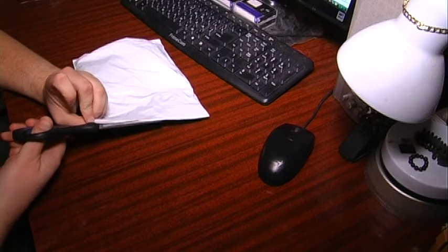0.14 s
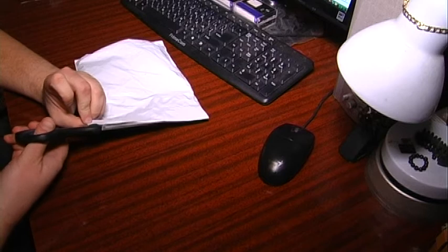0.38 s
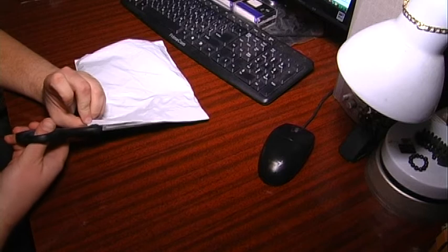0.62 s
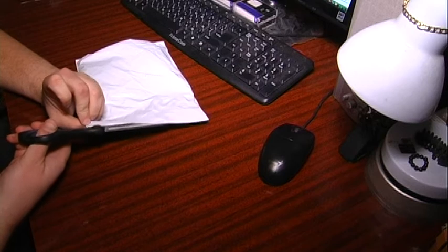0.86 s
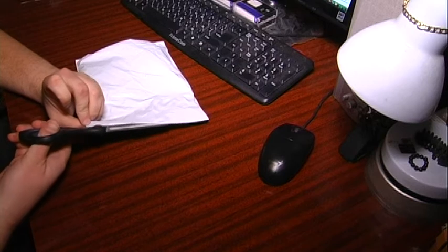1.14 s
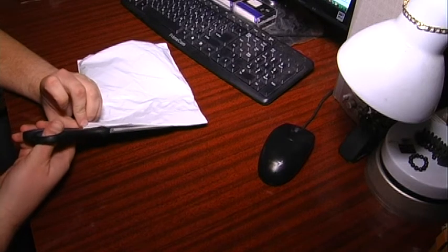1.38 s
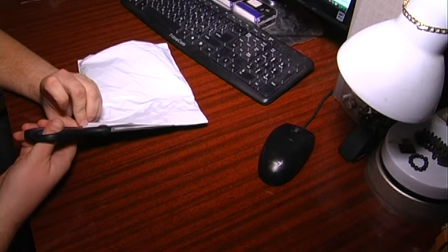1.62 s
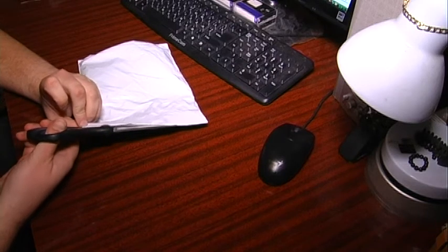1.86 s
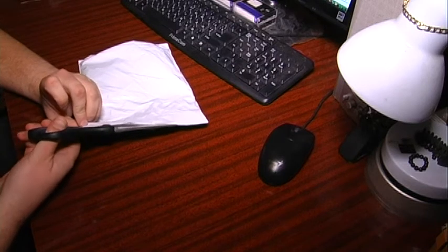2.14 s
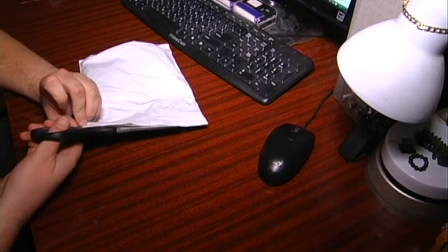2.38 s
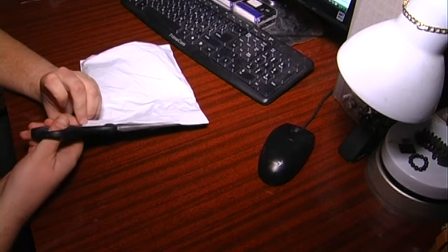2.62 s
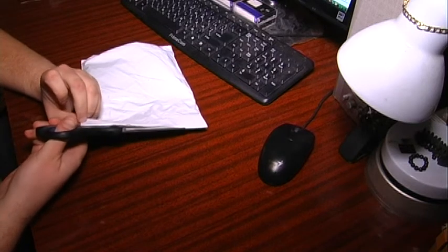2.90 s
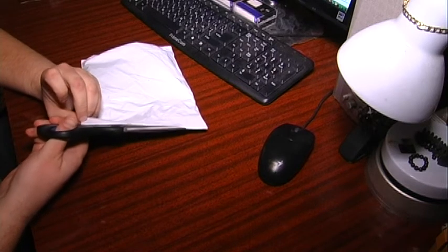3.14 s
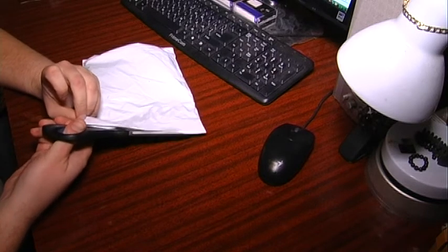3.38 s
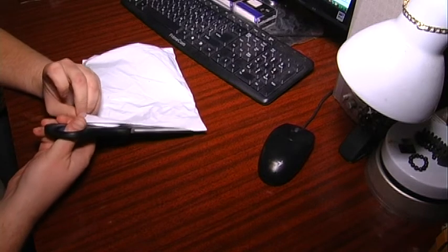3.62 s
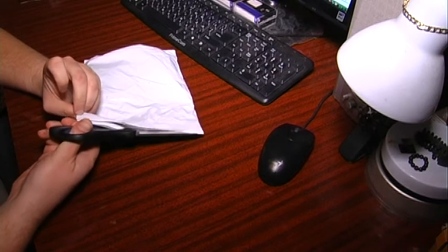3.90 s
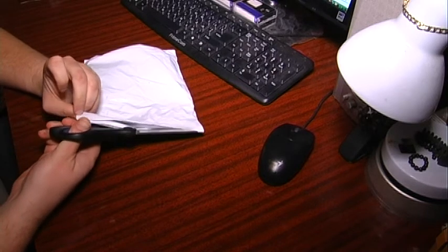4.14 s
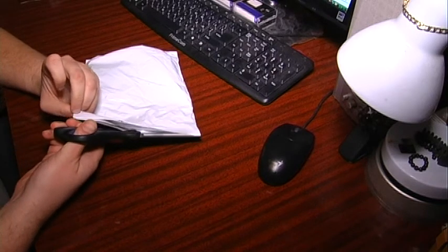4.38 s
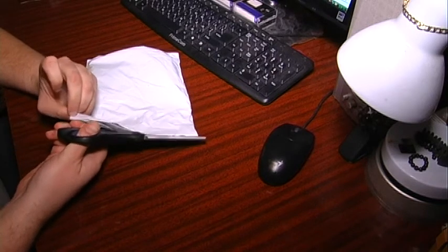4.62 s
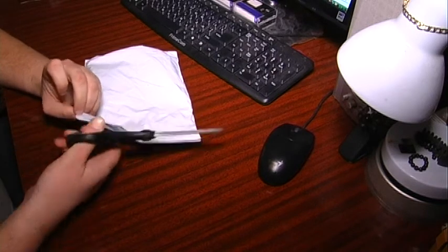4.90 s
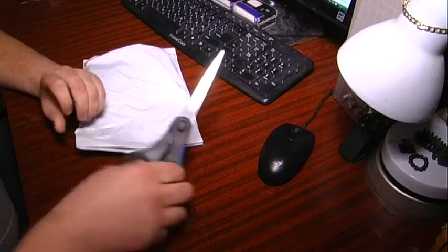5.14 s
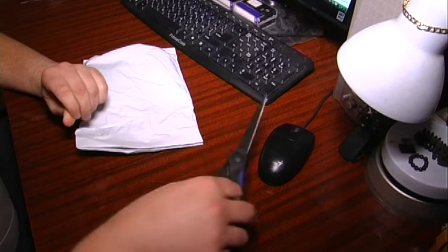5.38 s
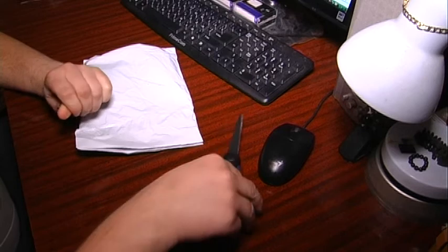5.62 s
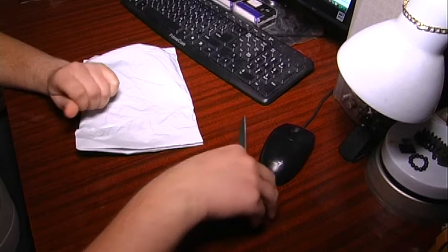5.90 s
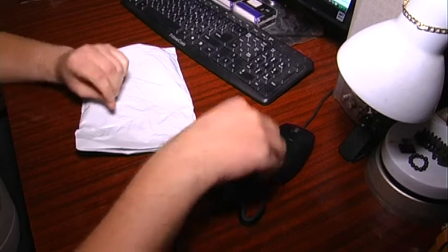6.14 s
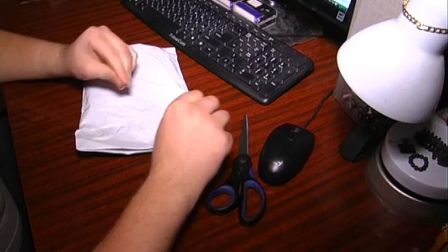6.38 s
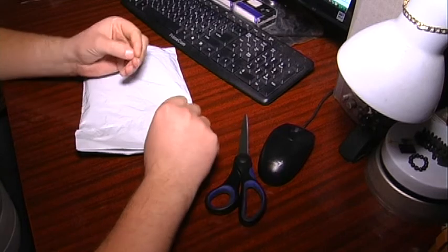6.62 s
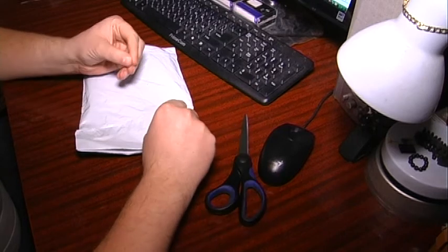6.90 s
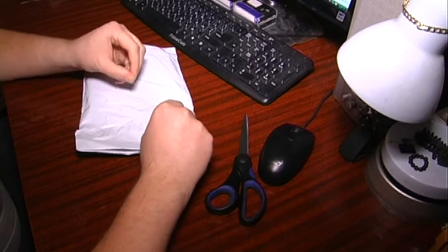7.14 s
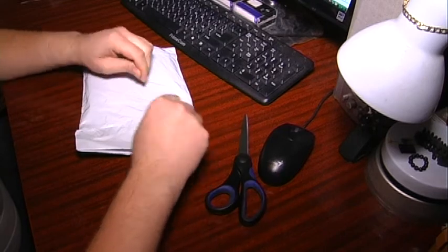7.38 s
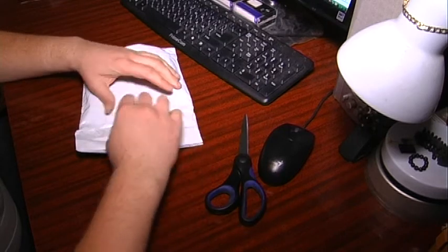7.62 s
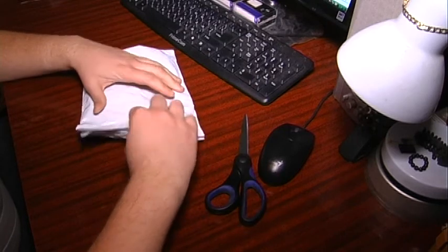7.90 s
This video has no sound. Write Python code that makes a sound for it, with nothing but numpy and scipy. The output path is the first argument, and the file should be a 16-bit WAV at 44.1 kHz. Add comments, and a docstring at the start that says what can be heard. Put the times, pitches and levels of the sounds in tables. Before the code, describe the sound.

In a quiet indoor room with soft fan noise and hum, close scissors slowly cut a thin plastic bag on a wooden desk, giving sparse faint ticks and brief rustles. Around five seconds a low motor buzz starts on the right and stays. The scissors are then put down with a sharp, loud double clatter, and after a pause hands crinkle the bag, increasingly crisp.

```python
"""Throughout, a camera close by hears a quiet room: fan noise and hiss as filtered noise, hum as steady sines.
For five seconds scissors snip slowly through a thin plastic bag on a wooden desk: film noise and resonant snaps.
At 5.1 s a low motor buzz, a sum of harmonics, starts in the right channel and goes on to the end.
From 5.7 s the scissors are laid down with a clatter, struck modes of scissors and desk.
From 7.5 s hands crinkle the bag, with denser film noise and snaps."""
import sys
import numpy as np
from scipy import signal
from scipy.fft import rfft, irfft, next_fast_len
from scipy.io import wavfile
from scipy.ndimage import uniform_filter1d

SR = 44100
rng = np.random.default_rng(int(sys.argv[2]) if len(sys.argv) > 2 else 0)


def attenuation_scalar(level_db):
    """Turn a level in dB into a linear amplitude multiplier (20 dB per decade)."""
    decades = np.asarray(level_db, float) / 20
    return 10 ** decades


def inscribe(sig):
    """Save sig as 16-bit PCM at rate SR to the path in sys.argv[1].

    A 1-D sig is mono; a 2-D sig holds one channel per row.
    Samples are clipped to [-1, 1] before scaling.
    """
    pcm = np.round(np.clip(np.atleast_2d(sig).T, -1, 1) * 32767)
    wavfile.write(sys.argv[1], SR, pcm.astype(np.int16))


N = 353241
T = np.arange(N) / SR  # time in s
M = next_fast_len(N, True)  # transform length
F = np.fft.rfftfreq(M, 1 / SR)  # frequency in Hz


def on_log(hz, table, column=1):
    """Logarithmic frequency scale: read a table by linear interpolation along it."""
    table = np.array(table)
    return np.interp(np.log(np.maximum(hz, 1)), np.log(table[:, 0]), table[:, column])


def unit(x):
    """Root-mean-square normalization: scale to rms 1."""
    return x / np.sqrt(np.mean(x ** 2))


def peak(x):
    """Peak normalization: scale to peak 1."""
    return x / np.abs(x).max()


def band(x, hz, width):
    """Simple resonance: a two-pole filter with gain 1 at its centre."""
    return signal.lfilter(*signal.iirpeak(min(hz, .44 * SR), hz / width, SR), x)


def walk(rate):
    """Low-pass random process: values drawn at a rate per second, smoothed twice, rms 1."""
    k = int(SR / rate)
    steps = np.repeat(rng.standard_normal(N // k + 1), k)
    smooth = uniform_filter1d(uniform_filter1d(steps, k), k)
    return unit(smooth[:N])


def add(track, s, sound):
    """Superposition: mix a short sound in at a time in seconds."""
    i = int(s * SR)
    track[..., i:i + sound.shape[-1]] += sound[..., :N - i]


def ring(modes, push):
    """Modal synthesis: a push convolved with decaying sines of varied strength; rms 1 over the first 10 ms."""
    hz, db, t60 = np.transpose(modes)[:, :, None]
    t = T[:int(SR * t60.max())]
    luck = attenuation_scalar(1.5 * rng.standard_normal((len(modes), 1)))
    decay = np.exp(-np.log(1000) * t / t60)
    body = (luck * attenuation_scalar(db) * np.sin(2 * np.pi * hz * t) * decay).sum(axis=0)
    sound = signal.fftconvolve(body, push)
    return sound / np.sqrt(np.mean(sound[:SR // 100] ** 2))


# Spectral shape of fan noise and hiss. Each row: frequency in Hz, relative density in dB per Hz.
AIR_COLOUR = [(15, -51), (25, -23.5), (108, -7.5), (162, -13), (454, -5), (579, -10), (739, -7), (943, -15),
              (1490, -16.5), (1960, -16), (2120, -18), (2940, -26), (5790, -27.5), (14900, -30),
              (16200, -40)]
# Stereo image of that noise. Each row: frequency in Hz, left minus right in dB, likeness of the channels 0-1.
AIR_STEREO = [(60, -8, 0.6), (191, 5, 0), (260, 10.5, 0.8), (414, -0.5, 0.52), (1000, 1.5, 0.91),
              (2000, -3.5, 0.44), (3050, -2.5, 0), (6000, 3, 0.03), (14980, 5.5, .05)]
# Narrow bands in the fan noise. Each row: centre in Hz, width in Hz, rms level in dB before a slow wander.
FAN_RESONANCES = [(179.8, 14, -74), (236.7, 13, -73.5), (427, 79, -83.5), (642.7, 5.3, -79.5),
                  (1943, 11, -83.5), (9930, 24, -97)]


def air():
    """Partial coherence: coloured noise partly shared by the ports, with narrow fan bands and a slow wander."""
    level_db, left_lag_s = -65.5, 0.00026
    shared, left, right = (rfft(rng.standard_normal(M)) for _ in range(3))
    like = np.clip(on_log(F, AIR_STEREO, column=2), 0, 1)
    lag = np.exp(-2j * np.pi * F * left_lag_s)
    common = np.sqrt(like) * shared * np.array([lag, lag ** 0])
    separate = np.sqrt(1 - like) * np.array([left, right])
    tilt = on_log(F, AIR_STEREO) / 2
    colour = attenuation_scalar(on_log(F, AIR_COLOUR) + np.array([tilt, -tilt]))
    out = attenuation_scalar(level_db) * unit(irfft((common + separate) * colour, M)[:, :N])
    for hz, width, db in FAN_RESONANCES:
        noise = rng.standard_normal((2, N))
        out += attenuation_scalar(db) * unit(band(noise + .5 * noise[::-1], hz, width))
    return out * attenuation_scalar(.5 * walk(1.62))


# Steady hum tones. Each row: frequency in Hz, left rms level in dB, right rms level in dB.
HUM_TONES = [(25, -86, -87), (50, -79, -86), (62.5, -84, -78), (100.01, -92, -67), (120.05, -85, -68),
             (8000, -91, -91), (15625, -79, -79)]


def hum():
    """Superposition of pure tones: steady sines at their own level in each channel."""
    out = np.zeros((2, N))
    for hz, left_db, right_db in HUM_TONES:
        level = attenuation_scalar(np.array([[left_db], [right_db]]))
        out += np.sqrt(2) * level * np.cos(2 * np.pi * hz * T)
    return out


# Blades slide through or along the film. Each row: start in seconds, length in seconds, level in dB,
# treble above 9 kHz in dB relative to that level.
BLADE_SLIDES = [(.0, 0.018, -77, 10), (0.197, 0.087, -82, 1), (0.396, 0.057, -75.5, -2), (.6, .03, -78, -1),
                (.66, .04, -76, -2), (0.778, 0.081, -70, -3), (1.475, 0.098, -75.5, 2.5),
                (1.862, .06, -77, -12), (1.927, 0.037, -74, 4), (2.41, .07, -75.5, 2.5),
                (3.006, 0.038, -69.5, 1.5), (3.156, 0.088, -78.5, 2), (3.51, 0.038, -69.5, 0.5),
                (3.72, 0.083, -70, -9), (3.817, 0.043, -81, -1), (3.963, 0.094, -69, -1.5),
                (4.153, 0.049, -74, -1), (4.19, 0.081, -73, -5), (4.429, 0.055, -74.5, 3.5),
                (4.735, .025, -75, -2), (4.9, .04, -74, -8), (4.972, 0.084, -74.5, -2),
                (5.093, .04, -75, -18)]


def slides():
    """Friction envelope: power of film motion in middle, treble and body; each slide rises, holds and decays."""
    attack_s, release_s, body_db = 0.011, 0.011, -3  # body is below 3 kHz
    power = np.zeros((3, N))
    t = T[:SR // 3]
    for s, length, db, treble_db in BLADE_SLIDES:
        shape = np.minimum(t / attack_s, 1) * np.exp(-np.maximum(t - length, 0) / release_s)
        level = attenuation_scalar(db + np.array([[0], [treble_db], [body_db]]))
        add(power, s, (level * shape) ** 2)
    return power


# Colour of the film's rustle. Each row: frequency in Hz, relative density in dB per Hz.
FILM_COLOUR = [(290, -4), (500, 3.5), (604, -6), (631, -0.5), (919, 7), (1110, 4), (2230, 0.5), (3590, -25),
               (4530, -13.5), (6060, -15), (16000, -29)]


def rustle():
    """Stick-slip noise: dense slips of uneven size, coloured by the film; more motion power is louder."""
    slips = rng.standard_normal(N) * attenuation_scalar(2.5 * rng.exponential(size=N) + 2.5 * walk(200))
    colour = rfft(slips, M) * attenuation_scalar(on_log(F, FILM_COLOUR))
    treble = 1 / (1 + (9000 / np.maximum(F, 1)) ** 8)
    body = 1 / (1 + (F / 3000) ** 8)
    parts = [unit(irfft(colour * share, M)[:N]) for share in (1 - treble - body, treble, body)]
    motion = slides() + flutter() + crumple()
    return (np.sqrt(motion) * parts).sum(axis=0)


# Single snaps of blade and film. Each row: start in seconds, crack peak in dB, crack pitch in Hz,
# dull tick rms over 4 ms in dB, tick pitch in Hz; levels are those before panning and the room.
FILM_SNAPS = [(.1538, -66, 5900, -65, 1950), (.4, -56, 5590, -72, 1910), (0.579, -54, 5930, -72, 1100),
              (.6054, -48, 7420, -59, 1310), (.61, -41, 6000, -67, 1730), (.6592, -40.5, 6700, -81, 1710),
              (0.6807, -54, 4060, -58, 1010), (.7831, -54, 5840, -64, 1620), (0.804, -45, 8100, -65, 1670),
              (.8776, -42, 4330, -81, 2440), (1.428, -50, 6930, -70, 1130), (1.528, -69, 7160, -59, 1500),
              (1.8476, -55, 4730, -84, 1950), (1.8783, -53, 5210, -82, 1000),
              (1.937, -45.5, 12400, -80, 1940), (1.9902, -36, 9000, -57.5, 1300),
              (2.4657, -53, 5240, -63, 1920), (2.4913, -40, 4730, -52.5, 2200),
              (2.5747, -47.5, 11000, -61.5, 1560), (3.012, -49, 12200, -74, 1100),
              (3.043, -39.5, 6400, -67, 2220), (3.0667, -38.5, 4440, -56.5, 2110),
              (3.165, -48, 6240, -60, 1700), (3.209, -51, 5800, -66, 1320),
              (3.2996, -68, 5670, -57.5, 2300), (3.5184, -46, 7500, -61.5, 1400),
              (3.5535, -50, 7460, -64, 1880), (3.5777, -37.5, 5700, -55, 2140),
              (3.715, -35, 10500, -57, 1530), (3.7308, -43, 11600, -66, 1720),
              (3.795, -39, 5200, -57, 1300), (3.863, -43.5, 6700, -63, 1360),
              (3.9792, -46, 5270, -61, 1080), (3.9936, -46, 8070, -69, 1630),
              (4.0264, -45, 7380, -67, 1320), (4.0485, -36, 5700, -55, 2000), (4.064, -49, 6020, -63, 1390),
              (4.146, -52, 9370, -68, 1120), (4.156, -55, 5280, -70, 1950), (4.1734, -48, 11900, -69, 1600),
              (4.196, -39.5, 10600, -79, 1970), (4.488, -54, 11700, -71, 1930),
              (4.5118, -34, 4630, -52.5, 1350), (4.564, -50, 8350, -67, 1780),
              (4.665, -54, 9930, -75, 1240), (4.7402, -47, 9800, -68, 1900), (4.9252, -55, 6120, -53, 1910),
              (4.9771, -42, 6100, -58.5, 1460), (5.103, -41.5, 3830, -58, 2290),
              (5.1127, -44, 4550, -59, 1140), (7.567, -49.5, 5570, -60, 1250),
              (7.5916, -55, 5780, -58, 1010), (7.6139, -47, 4020, -50.5, 1000),
              (7.7167, -50, 5870, -53.5, 2240), (7.7292, -46, 5940, -56, 1750),
              (7.748, -41, 5000, -60, 2300), (7.7628, -50, 4980, -50, 1100),
              (7.7704, -52, 11800, -58, 2280), (7.782, -39, 6240, -65, 2030),
              (7.8231, -41, 6440, -67, 2540), (7.831, -38, 8280, -65, 2500),
              (7.8544, -48, 5830, -53.5, 1040), (7.861, -42, 5880, -59, 1290),
              (7.9245, -35, 12900, -60, 1570), (7.9353, -31, 4700, -69, 2290),
              (7.956, -36, 6810, -51, 2600), (7.9713, -28.5, 4580, -61, 2570),
              (7.986, -29, 6560, -54, 1350), (8.0004, -44, 5360, -55, 1170)]


def snaps():
    """Excited resonance: a short decaying noise burst rings round its pitch, over a duller tick."""
    left_db, scatter_db = -1, 2.5  # mean and spread of left minus right: spots all over the bag
    out, t = np.zeros((2, N)), T[:SR // 40]
    for s, db, hz, tick_db, tick_hz in FILM_SNAPS:
        burst = rng.standard_normal((2, len(t)))
        crack = burst[0] * np.exp(-t / 0.00068)
        crack = band(crack, hz, 0.38 * hz) + 0.15 * band(crack, 7300, 18300) + 0.43 * band(crack, 6400, 600)
        tick = band(burst[1] * np.exp(-t / 0.0011), tick_hz, .5 * tick_hz)
        sound = attenuation_scalar(db) * peak(crack) + attenuation_scalar(tick_db) * tick / tick[:SR // 250].std()
        pan_db = left_db + scatter_db * rng.standard_normal()
        add(out, s, sound * attenuation_scalar(np.array([[pan_db], [-pan_db]]) / 2))
    return out


def flutter():
    """Free decay: after each snap the film's motion power dies away exponentially."""
    level_db, decay_s, treble_db, body_db = -27, 0.011, -14, 2  # level relative to the crack's peak
    power = np.zeros((3, N))
    level = attenuation_scalar(level_db + np.array([[0], [treble_db], [body_db]]))
    tail = level * np.exp(-T[:SR // 10] / decay_s)
    for s, db, *_ in FILM_SNAPS:
        add(power, s, (attenuation_scalar(db) * tail) ** 2)
    return power


# Harmonics of the motor. Each row: multiple of the turning rate, level in dB before waver and engagement,
# largest waver in dB.
BUZZ_HARMONICS = [(1, -90, 0.5), (4, -68, 1.5), (5, -63, 0.5), (6, -74, 3), (7, -54, 0.6), (8, -70, 5),
                  (9, -75, 5), (10, -71, 4)]


def motor_buzz():
    """Harmonic series: multiples of the turning rate, strongest just as the motor engages."""
    start_s, turning_hz = 5.118, 25
    since = np.maximum(T - start_s, 0)
    engage = (1 - np.exp(-since / 0.0097)) * (1 + 0.99 * np.exp(-since / 0.022))
    # it comes up to speed from slightly below
    turned = since - .035 - 0.0041 * (1 - np.exp(-since / 0.044))
    buzz = np.zeros(N)
    for k, db, waver_db in BUZZ_HARMONICS:
        level = attenuation_scalar(db + waver_db * np.clip(walk(1.9), -1, 1))
        buzz += np.sqrt(2) * level * np.cos(2 * np.pi * k * turning_hz * turned)
    shudder = attenuation_scalar(-67.5) * unit(band(rng.standard_normal(N), 190, 155.2))
    return engage * (buzz + shudder) * attenuation_scalar(np.array([[-35], [0]]))  # left 35 dB below right


def chatter(decay_s):
    """Repeated impact: loose parts chatter after a blow, as decaying noise led by one impulse."""
    push = rng.standard_normal(SR // 25) * np.exp(-T[:SR // 25] / decay_s)
    push[0] = 1.3
    return push


# The scissors land and rock on the desk. Each row: start in seconds, blade tick peak in dB, then pivot clack,
# handle knock and desk thud in dB rms over their first 10 ms; levels are those before the high-pass.
SCISSOR_LANDINGS = [(5.6941, -25, -38.5, -34.5, -39.5), (5.7142, -32.5, -43.5, -54.5, -48),
                    (5.887, -10.5, -35, -31, -39.5), (5.8959, -27.5, -31, -38, -53.5),
                    (5.9072, -33, -35, -26, -44.5), (5.9157, -37.5, -47, -46, -44.5),
                    (5.9324, -35.5, -56, -28.5, -38.5), (5.9415, -28, -39.5, -35, -32),
                    (5.9563, -30.5, -47, -55, -42), (5.973, -44, -51, -43.5, -42),
                    (5.9874, -61, -64, -59.5, -41.5), (6.103, -74, -47.5, -45, -46.5)]
# Modes of the blades, pivot, handles and desk top. Each row: frequency in Hz, relative level in dB,
# 60 dB decay time in seconds.
BLADE_MODES = [(3530, -4, 0.0055), (3980, 6, 0.0018), (4660, 6, 0.0066), (5540, 2, .004),
               (6100, -3.5, 0.0045), (7200, -8.5, .003), (7870, -20.5, 0.0031), (10800, -23, 0.0018)]
PIVOT_MODES = [(1258, -12.5, 0.013), (1360, 4.5, 0.019), (1680, 8, 0.015), (2050, 5.5, .01),
               (2190, 2, 0.011), (2704, -15.5, .01)]
HANDLE_MODES = [(644, 3, 0.057), (716, 1, 0.056), (818, 11, 0.023), (813, -3.5, 0.14), (900, -10, 0.033),
                (997, -2, 0.17)]
DESK_MODES = [(101, -5, .8), (126, -6, .2), (175, -9, .15), (209, 0, .25), (248, -3, .2), (279, -7, .2),
              (343, -2, .13), (393, -4, .11), (430, -3, .13), (490, -6, .1), (540, -5, .1)]


def landings():
    """Impact excitation: one blow makes blades and pivot chatter, handles knock and the desk top thud."""
    out = np.zeros(N)
    for s, tick_db, clack_db, knock_db, thud_db in SCISSOR_LANDINGS:
        add(out, s, attenuation_scalar(tick_db) * peak(ring(BLADE_MODES, chatter(0.0032))))
        add(out, s, attenuation_scalar(clack_db) * ring(PIVOT_MODES, chatter(0.0062)))
        add(out, s, attenuation_scalar(knock_db) * ring(HANDLE_MODES, np.hanning(16)))
        add(out, s, attenuation_scalar(thud_db) * ring(DESK_MODES, np.hanning(40)))
    # too small to radiate deep bass
    return signal.sosfilt(signal.butter(4, 85, "high", fs=SR, output="sos"), out)


# Hands press and crumple the bag, unevenly harder. Each row: time in seconds, level in dB.
HAND_CRUMPLE = [(7.48, -95), (7.56, -73), (7.69, -77), (7.725, -62.5), (7.81, -68.5), (7.835, -64),
                (7.91, -66.5), (7.935, -60.5), (8.01, -62)]


def crumple():
    """Amplitude envelope: the hands' force sets the power of film motion in middle, treble and body."""
    treble_db, body_db = -11, -1  # relative to the middle
    hands = attenuation_scalar(np.interp(T, *np.transpose(HAND_CRUMPLE))) * (T > HAND_CRUMPLE[0][0])
    return (hands * attenuation_scalar(np.array([[0], [treble_db], [body_db]]))) ** 2


# Reverberation time of the room. Each row: frequency in Hz, 60 dB decay time in seconds.
REVERBERATION = [(100, 0.47), (500, 0.23), (2000, 0.31), (4000, 0.17), (12000, 0.2)]
# Echoes off desk and nearby things. Each row: delay in seconds, left level in dB, right level in dB, polarity;
# levels are relative to the direct sound.
CLOSE_ECHOES = [(.0005, -9, -14, 1), (.0011, -14, -9, -1), (.0018, -10, -14, -1), (.0027, -14, -10, 1),
                (.0037, -12, -12, -1)]


def room():
    """Room impulse response: direct sound, close echoes, then a diffuse tail that lasts longest in the bass."""
    tail_db = -10.5  # energy relative to the direct sound
    t = T[:int(.7 * SR)]
    out = np.zeros((2, len(t)))
    for hz in 90 * 2 ** np.arange(0, 7.5, .5):
        noise = rng.standard_normal(out.shape)
        shared = 1 / (1 + hz / 400)  # long waves reach both ports alike
        diffuse = band(noise + shared * noise[::-1], hz, 0.25 * hz) / np.sqrt(1 + shared ** 2)
        out += diffuse * np.exp(-np.log(1000) * t / on_log(hz, REVERBERATION))
    out *= 1 - np.exp(-t / 0.006)
    out *= attenuation_scalar(tail_db) / np.sqrt((out ** 2).sum(axis=1, keepdims=True))
    for s, left_db, right_db, polarity in CLOSE_ECHOES:
        out[:, int(s * SR)] += polarity * attenuation_scalar(np.array([left_db, right_db]))
    out[:, 0] += 1  # direct sound
    return out


# How the two microphone ports differ for near sounds. Each row: frequency in Hz, left minus right in dB,
# phase lag of the left in radians.
PORT_DIFFERENCES = [(60, -9, 1.6), (204, -3.5, 0.35), (500, 2, 1), (800, -3, 0.71), (1100, 6, 1.8),
                    (1445, -4, 1.96), (3000, -1.5, 2.1), (4510, -7, 1.95), (5880, -4, 1.64),
                    (8500, -4, 1.75), (15000, -9.5, 2)]


def ports():
    """Interaural-style differences: a level tilt between the ports and a phase lag of the left one."""
    tilt = on_log(F, PORT_DIFFERENCES) / 2
    lag = on_log(F, PORT_DIFFERENCES, column=2)
    return attenuation_scalar(np.array([tilt, -tilt])) * np.exp(-1j * np.array([lag, 0 * lag]))


def scene():
    """Linear superposition: near sounds convolved with room and ports, plus the background."""
    near = rfft(rustle() + snaps() + landings(), M) * rfft(room(), M) * ports()
    return irfft(near, M)[:, :N] + air() + hum() + motor_buzz()


def low_pass(x):
    """Removes everything above the highest recorded frequency."""
    return signal.sosfilt(signal.butter(12, 16670, fs=SR, output="sos"), x)


def record(dry):
    """Low-pass filtering: the camera cuts the top above 16.3 kHz with a steep elliptic filter."""
    top = signal.ellip(8, .2, 60, 16300, fs=SR, output="sos")
    mix = signal.sosfilt(top, dry)
    return low_pass(mix)


dry = scene()
out = record(dry)
inscribe(out)
```